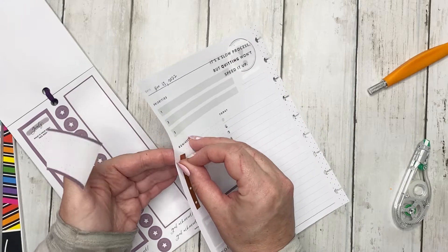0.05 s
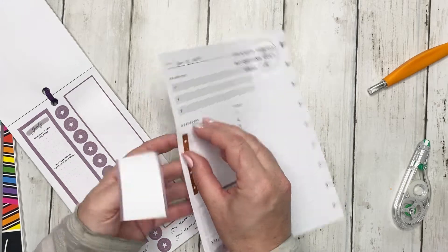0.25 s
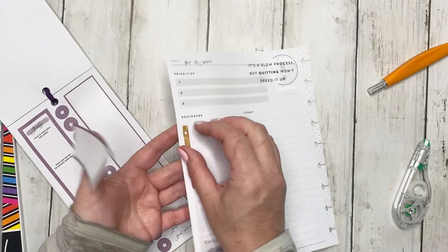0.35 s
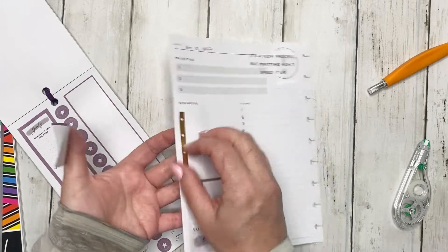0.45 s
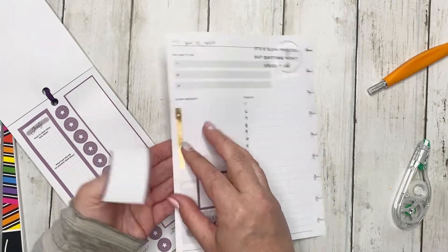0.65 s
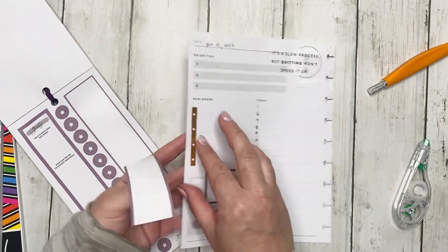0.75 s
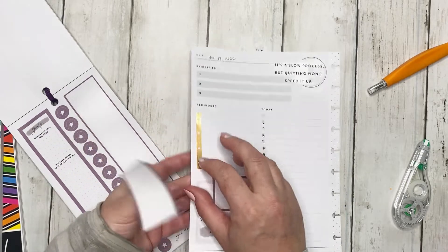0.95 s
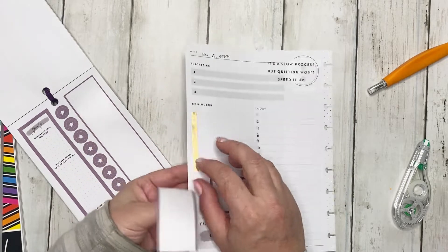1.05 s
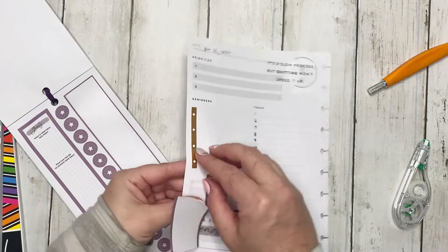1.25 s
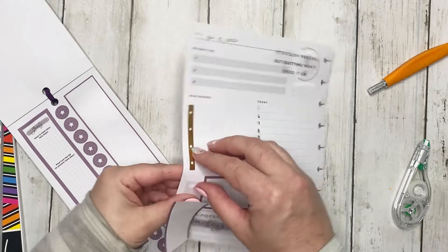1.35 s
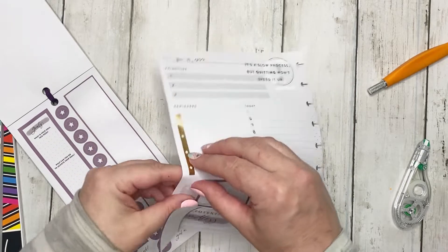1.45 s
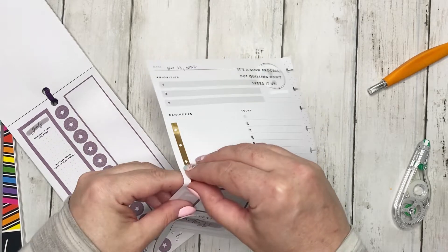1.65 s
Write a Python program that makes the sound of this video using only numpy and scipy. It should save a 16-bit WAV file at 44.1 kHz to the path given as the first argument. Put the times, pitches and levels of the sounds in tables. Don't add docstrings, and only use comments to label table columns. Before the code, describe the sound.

Close-up paper handling at a desk: soft fingertip rubbing, a cluster of hollow buckling pops, light sliding whispers, then a sticker peels with fizz, bright snaps and more pops before fading into faint room hiss.

```python
import sys
import numpy as np
from scipy import signal
from scipy.fft import rfft, irfft
from scipy.io import wavfile
from scipy.ndimage import uniform_filter1d

SR = 44100
rng = np.random.default_rng(int(sys.argv[2]) if len(sys.argv) > 2 else 0)


def log_audio(samples):
    frames = np.atleast_2d(samples).T
    limited = np.clip(frames, -1, 1)
    pcm = np.round(limited * 32767).astype(np.int16)
    wavfile.write(sys.argv[1], SR, pcm)


def voltage_ratio(level):
    return 10 ** (np.asarray(level, float) / 20)


N = 74970

# pitch_hz, level_db
ROOM_COLOUR = [(120, -15), (272, -7), (552, -23.5), (800, -13.5), (2100, -26.5), (5500, -31), (9000, -32),
               (14500, -29.5)]
# time_s, level_db
PAGE_MOVEMENT = [
    (0.0, -72.5),
    (.2, -64),
    (0.458, -50),
    (.7, -57),
    (.85, -65),
    (1.02, -73.5),
    (1.3, -53.5),
    (1.55, -66),
    (1.7, -71.5),
]
# pitch_hz, level_db
RUSTLE_COLOUR = [(150, -39), (250, -6), (398, 5), (938, -0.5), (1090, 10.5), (1280, -10.5), (1460, 8),
                 (4000, -30.5), (5200, -145), (8800, -120)]
# start_s, length_s, level_db, drag_db (coarse drag relative to fine hiss)
STROKES = [(0.056, 0.085, -57, -29), (0.168, 0.15, -45, -4), (0.237, 0.15, -52.5, 2.5),
           (0.298, 0.3, -52, -10.5), (0.522, 0.15, -48, -8), (0.609, 0.17, -46.5, -8.5),
           (0.734, 0.15, -46, -10), (0.838, 0.081, -57, -43), (0.886, 0.14, -46, -7),
           (0.946, 0.32, -65.5, -1.5), (1.149, 0.24, -42.5, -6.5), (1.33, 0.12, -52.5, 0.5),
           (1.411, 0.17, -63.5, -2.5), (1.53, 0.12, -63, -2), (1.65, 0.078, -70, -4)]
# pitch_hz, level_db
HISS_COLOUR = [(4410, -67), (7500, -28), (8100, -5.5), (12300, 7.5), (13600, 0.5), (14500, -4.5)]
# pitch_hz, level_db
DRAG_COLOUR = [(1700, -18), (2500, -7), (3600, -7.5), (4500, -12), (5600, -6.5), (6500, -7), (7500, -2),
               (9500, -13), (11000, -34)]
# start_s, length_s, level_db, pitch_hz, width_hz
SLIDES = [(0.077, 0.063, -65.5, 3320, 320), (0.14, 0.12, -69, 9200, 504), (0.25, 0.43, -57, 3000, 980),
          (0.37, 0.24, -64, 5280, 1100), (0.57, 0.22, -54.5, 2780, 2340), (0.739, 0.12, -59.5, 1590, 190),
          (.735, 0.097, -61.5, 1175, 140), (1.09, 0.069, -70.5, 1820, 100), (0.767, 0.17, -57.5, 3250, 800),
          (.9, 0.093, -56, 3020, 410), (.78, 0.078, -67, 2380, 150), (.226, .014, -47.5, 4100, 280),
          (1.27, 0.041, -48, 2950, 280), (1.036, 0.12, -74, 4000, 490), (1.228, 0.12, -49, 2670, 880),
          (0.158, .08, -60, 1900, 410), (0.1546, 0.12, -64, 850, 220), (0.446, 0.024, -60, 5440, 1400),
          (0.94, .05, -65.5, 2020, 150), (1.372, 0.27, -62, 6940, 390), (1.417, 0.21, -57.5, 8670, 1700),
          (1.552, 0.06, -67.5, 1400, 79), (0.645, 0.07, -62.5, 4600, 880)]
# time_s, peak_db, pitch_hz,
# shudder_s, spread_octaves
POPS = [(0.193, -47.5, 850, 0.014, .4), (0.208, -41.5, 1370, 0.03, 0.66),
        (0.271, -27.5, 1126, 0.013, 0.53), (0.292, -19.5, 1010, 0.005, 0.6),
        (0.301, -30.5, 1290, 0.021, 0.87), (0.36, -35.5, 575, 0.044, 0.64),
        (0.422, -33, 730, 0.027, 0.78), (0.439, -27.5, 1080, 0.03, 0.64),
        (0.465, -42.5, 990, 0.041, 0.52), (0.533, -43, 395.4, 0.024, 0.13),
        (0.731, -49, 544, 0.018, 0.18), (0.797, -50, 252, 0.0055, 0.073),
        (1.0372, -39.5, 980, 0.024, 0.71), (1.061, -45.5, 1160, 0.026, 0.86),
                (1.12, -47.5, 860, 0.0025, 0.55), (1.185, -41.5, 990, 0.018, 0.88),
                (1.202, -21, 1160, 0.013, 0.72), (1.237, -36, 1110, 0.012, 0.43),
                (1.339, -30.5, 910, 0.017, 0.65), (1.368, -26, 930, 0.021, 0.63),
                (1.388, -36.5, 856, 0.036, 0.62), (1.432, -30, 1003, 0.035, 0.55),
                (1.468, -40.5, 810, 0.026, 0.77)]
# peak_time_s, peak_db, pitch_hz, swell_s
FOLDS = [(.222, -43, 1000, 0.0048), (0.224, -49, 1535, .008), (.252, -45.5, 1045, .01),
         (.276, -26, 1090, 0.0019), (.276, -27.5, 1456, 0.0019), (.277, -37, 608, 0.0037),
         (0.2946, -16, 896, 0.0013), (.298, -25.5, 1010, 0.0011), (.303, -33, 2300, 0.0035),
         (.305, -24.5, 1096, .003), (.316, -42, 1175, 0.00288), (.3465, -28.5, 890, 0.00219),
         (.366, -34, 396, 0.00431), (.372, -31.5, 487, 0.0017), (.377, -26.5, 790, 0.00193),
         (0.381, -30, 1130, 0.00204), (.386, -36.5, 543, 0.0019), (0.391, -34, 370, .003),
         (.399, -43, 755, 0.0026), (.426, -37, 498, 0.00273), (.443, -24, 1050, 0.00244),
         (.443, -31, 1510, .0025), (.442, -30.5, 805, 0.0024), (.452, -32.5, 960, 0.0019),
         (1.045, -44.5, 1183, .006), (1.075, -55.5, 804, .012), (1.207, -26, 784.6, .006),
                 (1.207, -28, 1196, .003), (1.213, -26, 1333, .003), (1.204, -33, 2010, .003),
                 (1.205, -33, 2410, .004), (1.209, -35.5, 2870, .005), (1.209, -31.5, 419, 0.0033),
                 (1.218, -30, 760, .002), (1.234, -45, 743, .004), (1.243, -37, 896, .003),
                 (1.267, -40.5, 823, .004), (1.288, -34, 474, .01), (1.285, -37.5, 977, .008),
                 (1.315, -30, 650, .002), (1.315, -34, 1274, .002), (1.37, -28, 608, .002),
                 (1.374, -24.5, 982, .003), (1.381, -26.5, 705, .002), (1.392, -34.5, 910, .002),
                 (1.408, -29, 920, .002), (1.432, -34.5, 1110, .004), (1.44, -26.5, 883, .002),
                 (1.446, -27, 890, .002), (1.455, -19, 670, .0025), (1.457, -34.5, 1508, .003),
                 (1.463, -29, 1006, .002), (1.466, -36, 620, .002), (1.471, -38.5, 390, 0.0091),
                 (1.306, -33.5, 1470, 0.00161), (1.691, -34.5, 992, .002), (1.691, -39.5, 504, .002)]
# time_s, peak_db, pitch_hz, ring_cycles
CREASES = [
    (.2738, -27, 2300, 7.0),
    (1.039, -50, 3000, 7.0),
    (1.2023, -16.5, 1900, 4.0),
    (1.369, -32, 3000, 7.0),
    (.2933, -9.5, 2600, 7.0),
    (1.3055, -17, 880, 3.2),
]
# time_s, peak_db, length_s
SNAPS = [
    (0.446, -38, 0.016),
    (0.52, -41.5, 0.0048),
    (1.037, -53, 0.0074),
    (1.334, -30, 0.0032),
    (1.3253, -17, .0034),
    (1.2, -25.5, 0.0057),
    (1.341, -25.5, 0.0049),
    (1.373, -34, 0.0046),
    (1.375, -33, 0.0014),
]
# pitch_hz, width_hz, level_db
BACKING_RESONANCES = [(2300, 160, -6), (3243, 300, -5), (5040, 350, -10), (7900, 1080, -2),
                      (10440, 1900, 3.5), (13300, 1600, -4.5)]
# time_s, level_db
PEEL_STRENGTH = [
    (1.06, -96),
    (1.115, -77),
    (1.126, -47),
    (1.165, -52.5),
    (1.2, -49.5),
    (1.3, -64),
    (1.34, -69),
    (1.39, -57),
    (1.43, -77),
]
# pitch_hz, level_db
FIZZ_COLOUR = [(1600, -43), (2700, -3.5), (4200, -0.5), (5400, 3), (7000, 2), (7900, -8), (10000, -53)]


def rms_one(x):
    return x / np.sqrt(np.mean(x ** 2) + 1e-20)


def in_time(rows):
    return np.interp(np.arange(N) / SR, *np.transpose(rows))


def drift(rate_hz):
    r = np.exp(-40 * np.pi * rate_hz / SR)
    noise = rng.standard_normal(N // 20 + 2002)
    slow = signal.lfilter([1], [1, -2 * r, r * r], noise)[2000:]
    return np.interp(np.arange(N) / 20, np.arange(len(slow)), rms_one(slow))


def shaped(x, colour):
    hz, db = np.transpose(colour)
    pitches = np.log(np.fft.rfftfreq(len(x), 1 / SR) + 1)
    return irfft(rfft(x) * voltage_ratio(np.interp(pitches, np.log(hz), db)), len(x))


def grains(colour, per_s, spread_db, patchy_db, patch_rate_hz):
    happens = rng.random(N) < per_s / SR
    size = voltage_ratio(spread_db * np.minimum(rng.exponential(1, N), 4))
    x = shaped(happens * size * rng.standard_normal(N), colour)
    edges = 100 * 2 ** np.arange(0, 7.7, 0.3)
    out = np.zeros(N)
    for k, (low, high) in enumerate(zip(edges, edges[1:])):
        patches = voltage_ratio(patchy_db * drift(patch_rate_hz))
        band = signal.butter(2, [low, high], "band", fs=SR, output="sos")
        out += (-1) ** k * patches * signal.sosfilt(band, x)
    return rms_one(out)


def ring(x, hz, t60_s):
    r, w = voltage_ratio(-60 / (t60_s * SR)), 2 * np.pi * hz / SR
    return signal.lfilter([np.sin(w)], [1, -2 * r * np.cos(w), r * r], x + 1e-18)


def whisper(hz, width_hz):
    t60_s = np.log(1000) / np.pi / width_hz
    return rms_one(ring(ring(rng.standard_normal(N), hz, t60_s), hz, t60_s))


def arch(start_s, length_s, skew):
    progress = np.clip((np.arange(N) / SR - start_s) / length_s, 0, 1)
    return np.sin(np.pi * progress ** skew)


def add(out, start_s, peak_db, x):
    i = int(start_s * SR)
    out[i:i + len(x)] += (voltage_ratio(peak_db) * x / np.abs(x).max())[:N - i]


def room_tone():
    hiss = voltage_ratio(-66.5) * grains(ROOM_COLOUR, 27000, 0.1, 0.95, 6)
    hum = voltage_ratio(-71.5 + 1.0 * drift(10)) * whisper(hz=258.6, width_hz=37)
    return hiss + hum


def rustle():
    return voltage_ratio(in_time(PAGE_MOVEMENT)) * grains(RUSTLE_COLOUR, 2200, 0.53, 5.4, 39)


def rubbing():
    hiss_level, drag_level = np.zeros(N), np.zeros(N)
    for start_s, length_s, level_db, drag_db in STROKES:
        hiss_level += voltage_ratio(level_db) * arch(start_s, length_s, skew=0.9) ** 2.4
        drag_level += voltage_ratio(level_db + drag_db) * arch(start_s, length_s, skew=0.93) ** 2.84
    hiss = hiss_level * grains(HISS_COLOUR, 15000, 1.2, 2.0, 12)
    drag = drag_level * grains(DRAG_COLOUR, 12000, 1.3, 3.0, 8)
    return hiss + drag


def slides():
    out = np.zeros(N)
    for start_s, length_s, level_db, hz, width_hz in SLIDES:
        swell = arch(start_s, length_s, skew=0.66) ** 1.38
        out += voltage_ratio(level_db + 1.8 * drift(38)) * swell * whisper(hz, width_hz)
    return out


def pops():
    out, t = np.zeros(N), np.arange(6000) / SR
    page_pitches = np.geomspace(250, 3400, 26)
    for time_s, peak_db, hz, shudder_s, octaves in POPS:
        body = np.exp(-(t / shudder_s) ** 3.4)
        tail = voltage_ratio(-12.5) * np.exp(-t / 0.021)
        shudder = rng.standard_normal(len(t)) * (body + tail)
        shudder[0] = 2.7
        shudder *= np.clip(0.15 + t / (0.13 * shudder_s), 0, 1)
        edges = [hz / 2 ** (2 * octaves), hz * 2 ** (2 * octaves)]
        shudder = signal.sosfilt(signal.butter(2, edges, "band", fs=SR, output="sos"), shudder)
        closeness = np.exp(-(np.log2(page_pitches / hz) / octaves) ** 2)
        chance = voltage_ratio(0.9 * rng.standard_normal(len(page_pitches)))
        strengths = closeness * chance * (page_pitches / hz) ** 0.81
        pop = np.zeros(len(t))
        for k, (pitch, strength) in enumerate(zip(page_pitches, strengths)):
            pop += strength * (-1) ** k * ring(shudder, pitch, 7.12 / pitch)
        add(out, time_s, peak_db, pop)
    return out


def folds():
    out, t = np.zeros(N), np.arange(3500) / SR
    for peak_time_s, peak_db, hz, swell_s in FOLDS:
        wobble = 1 + 0.028 * rms_one(uniform_filter1d(rng.standard_normal(len(t)), size=150))
        start_phase = np.pi * rng.standard_normal()
        tone = np.sin(np.cumsum(2 * np.pi * hz * wobble / SR) + start_phase)
        swell = (t / swell_s) ** 2 * np.exp(-2 * t / swell_s)
        add(out, peak_time_s - swell_s, peak_db, swell * tone)
    return out


def creases():
    out, t = np.zeros(N), np.arange(1500) / SR
    grit = 0.022 * rng.standard_normal(len(t)) * np.exp(-t / 0.006)
    click = np.convolve((t == 0) + grit, np.hanning(9))
    for time_s, peak_db, hz, cycles in CREASES:
        t60_s = cycles / hz
        main = ring(click, hz, t60_s)
        neighbour = ring(click, hz * 1.106, t60_s)
        overtone = ring(click, hz * 2.42, t60_s)
        add(out, time_s, peak_db, main - 1.048 * neighbour + 0.022 * overtone)
    return out


def snaps():
    out, t = np.zeros(N), np.arange(2000) / SR
    for time_s, peak_db, length_s in SNAPS:
        swell = (t / length_s) ** 2 * np.exp(-5.0 * t / length_s)
        burst = rng.standard_normal(len(t)) * swell
        snap = np.zeros(len(t))
        for hz, width_hz, level_db in BACKING_RESONANCES:
            t60_s = 2.0 / width_hz
            snap += voltage_ratio(level_db) * rms_one(ring(ring(burst, hz, t60_s), hz, t60_s))
        add(out, time_s, peak_db, snap)
    return out


def peel():
    return voltage_ratio(in_time(PEEL_STRENGTH)) * grains(FIZZ_COLOUR, 9000, 2.0, 3.5, 6)


def room(x):
    t60_s, wall_cut_hz = 0.24, 3600
    w = 2j * np.pi * np.fft.rfftfreq(2 * N) * SR
    dull = 1 / (1 + w / (2 * np.pi * wall_cut_hz))
    echoes = 0
    for k, delay_s in enumerate(rng.uniform(0.006, 0.035, 8)):
        one_round = voltage_ratio(-60 * delay_s / t60_s) * dull * np.exp(-w * delay_s)
        echoes = echoes + (-1) ** k * one_round / (1 - one_round)
    return irfft(rfft(x, 2 * N) * echoes)[:N]


def scene():
    paper = rustle() + rubbing() + slides() + pops() + folds() + creases()
    desk = paper + snaps() + peel()
    return (desk + voltage_ratio(-18) * room(desk) + room_tone())[None]


def band_limit(x):
    return signal.sosfilt(signal.butter(12, 14780, fs=SR, output="sos"), x)


def record(dry):
    low_cut = signal.butter(8, 212, "high", fs=SR, output="sos")
    top_cut = signal.cheby2(10, 45, 15050, fs=SR, output="sos")
    mix = signal.sosfilt(low_cut, dry) + voltage_ratio(-39) * dry
    mix = signal.sosfilt(top_cut, mix)
    return band_limit(mix)


dry = scene()
out = record(dry)
log_audio(out)
```